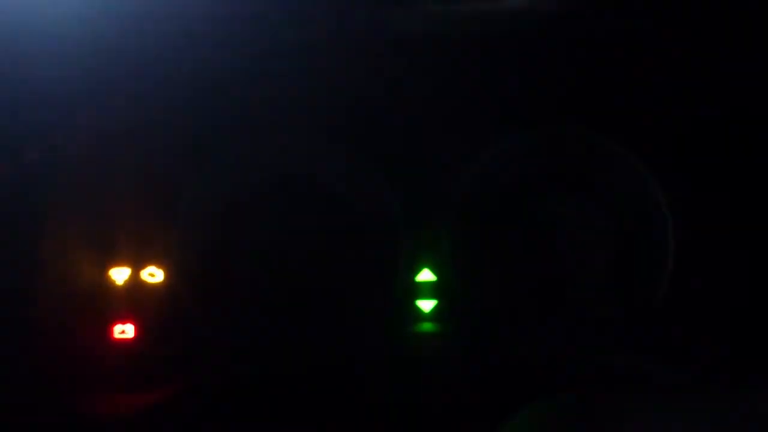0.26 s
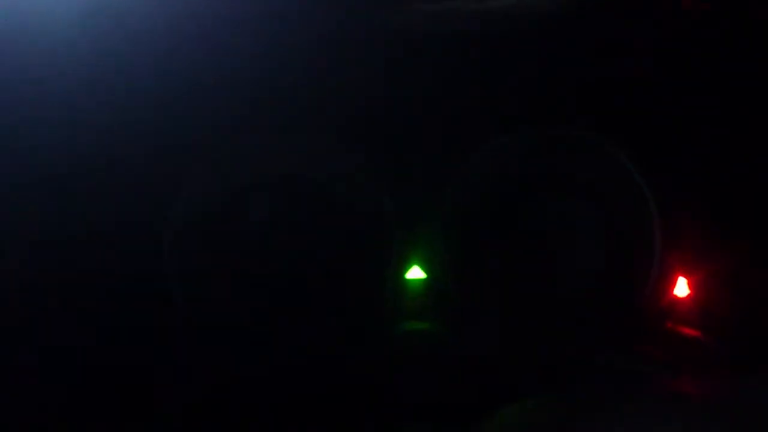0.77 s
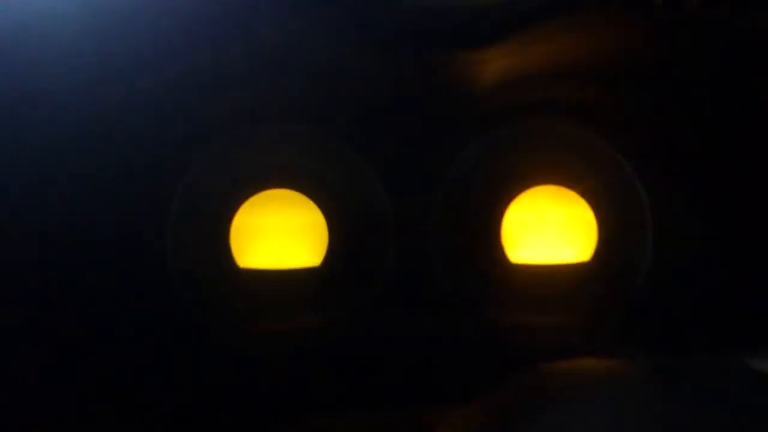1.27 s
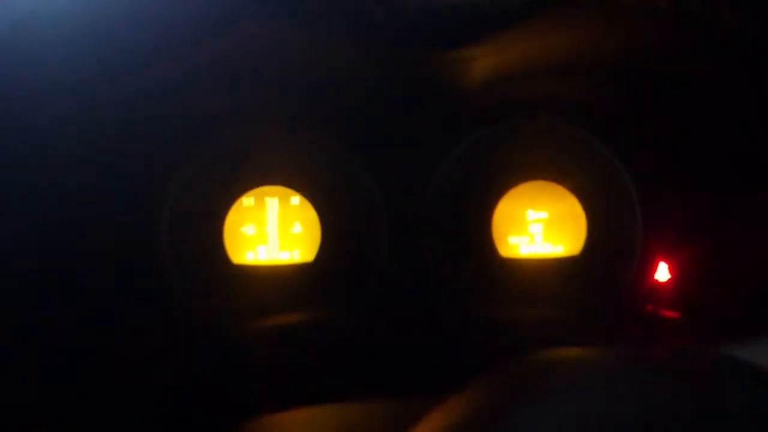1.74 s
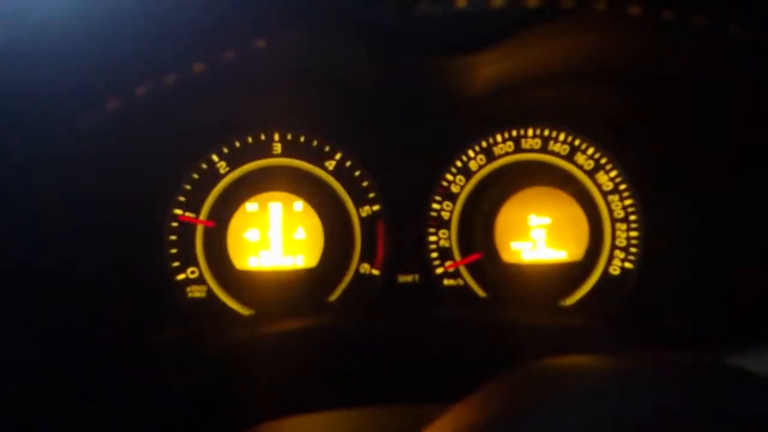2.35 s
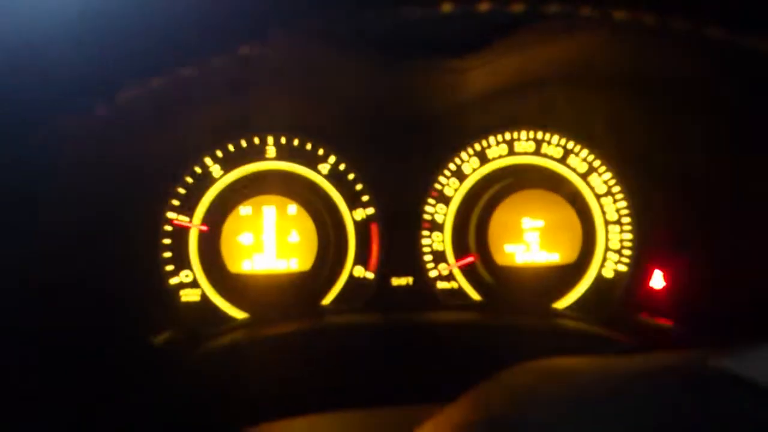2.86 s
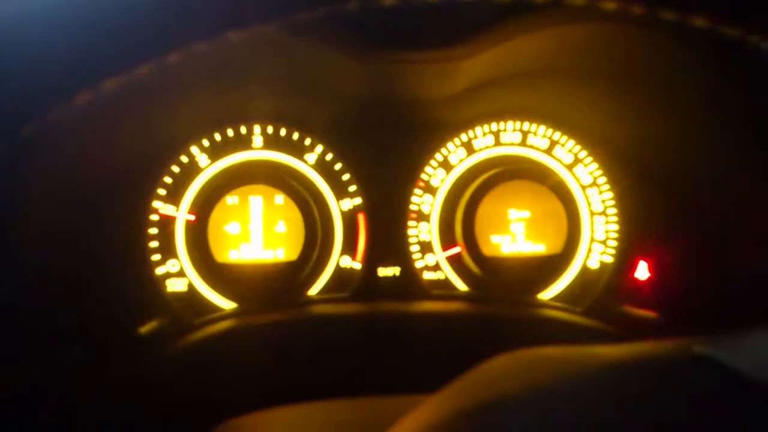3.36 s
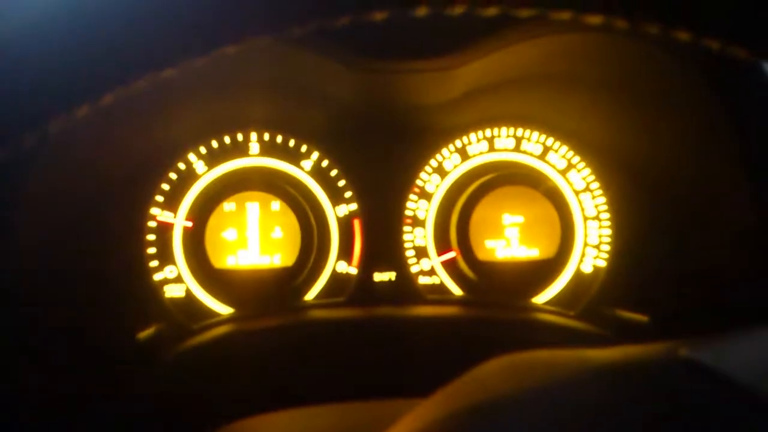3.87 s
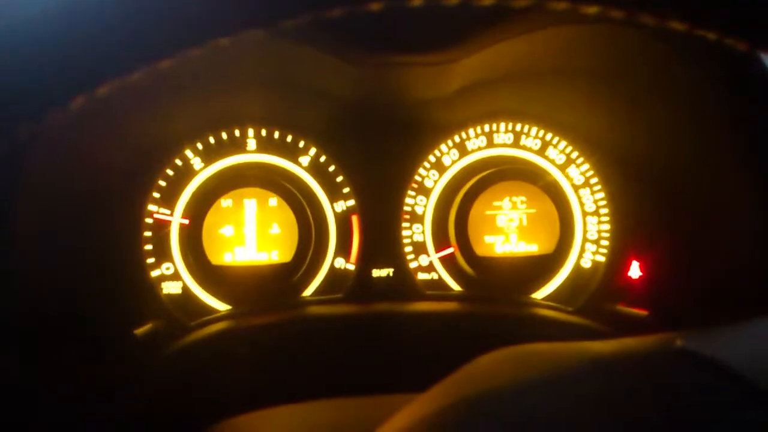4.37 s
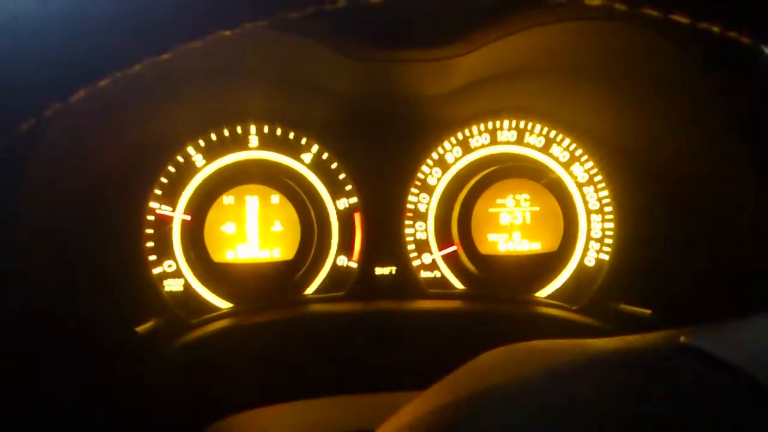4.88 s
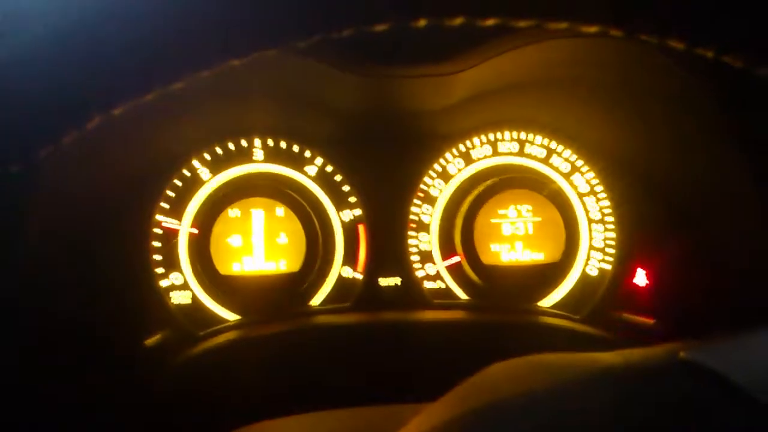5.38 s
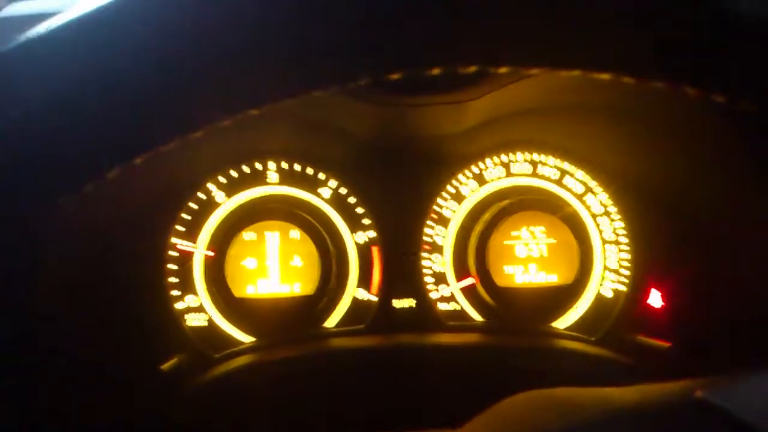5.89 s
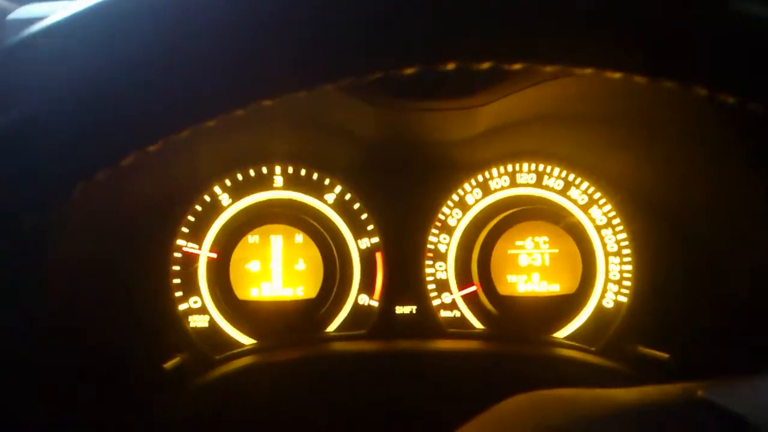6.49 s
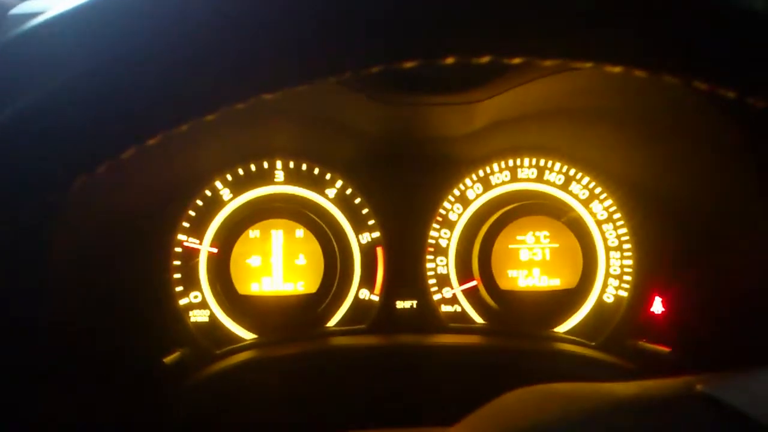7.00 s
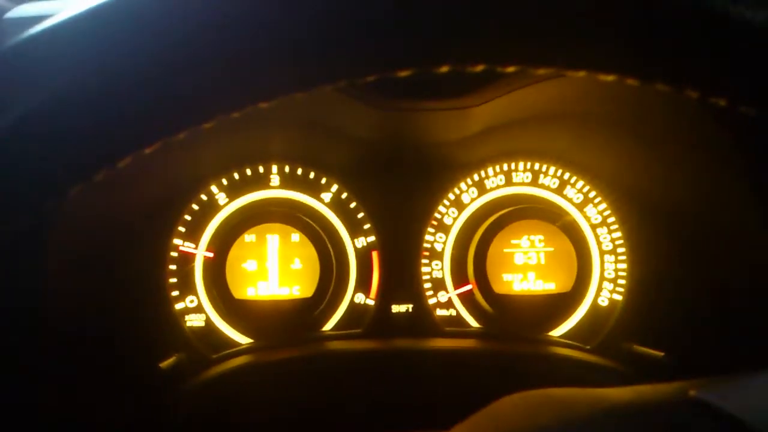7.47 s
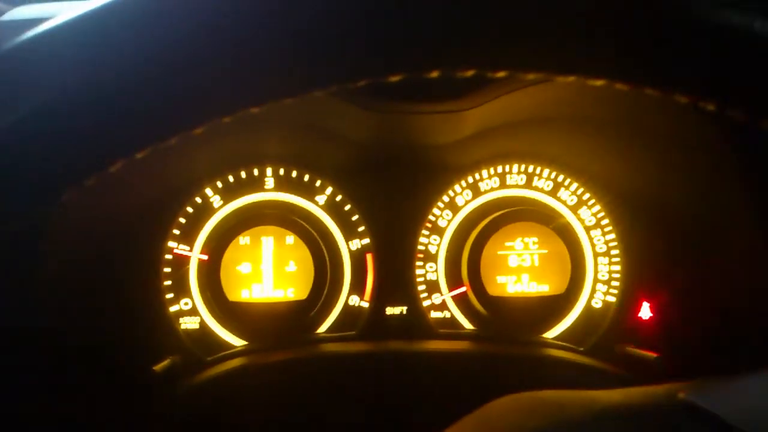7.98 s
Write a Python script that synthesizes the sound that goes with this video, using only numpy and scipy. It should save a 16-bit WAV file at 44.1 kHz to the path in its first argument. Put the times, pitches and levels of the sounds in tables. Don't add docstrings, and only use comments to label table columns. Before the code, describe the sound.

A labouring starter whirrs briefly, a four-cylinder diesel fires up and booms into clattery idle, with cloth rustles and small clicks near the microphone.

```python
import sys
import numpy as np
from scipy import signal
from scipy.fft import rfft, irfft, next_fast_len
from scipy.io import wavfile
from scipy.ndimage import uniform_filter1d

SR = 44100
rng = np.random.default_rng(int(sys.argv[2]) if len(sys.argv) > 2 else 0)


def materialize(psi):
    bounded = np.clip(np.atleast_2d(psi).T, -1, 1)
    quanta = np.round(bounded * 32767).astype(np.int16)
    wavfile.write(sys.argv[1], SR, quanta)


def voltage_ratio(decibels):
    exponent = np.asarray(decibels, float) / 20
    return 10 ** exponent


N = 363384
T = np.arange(N) / SR


def curve(table):
    s, *columns = np.transpose(table)
    return [np.interp(T, s, c) for c in columns]


def by_speed(table, hz):
    rate, *columns = np.transpose(table)
    return [np.interp(hz, rate, c) for c in columns]


def ramp(start, end):
    return np.clip((T - start) / (end - start), 0, 1)


def heard(table, fade=0.024):
    inside = np.clip(np.minimum(T - table[0][0], table[-1][0] - T) / fade + 1, 0, 1)
    return inside * voltage_ratio(curve(table)[0])


def unit(x):
    return x / np.sqrt(np.mean(x ** 2))


def colour(x, spectrum):
    hz, db = np.transpose(spectrum)
    size = next_fast_len(N)
    f = np.arange(1, size // 2 + 2) * SR / size
    gain = voltage_ratio(np.interp(np.log(f), np.log(hz), db, -120, -120))
    return unit(irfft(rfft(x, size) * gain, size)[:N])


def ring(x, modes):
    out = np.zeros(N)
    for k, (hz, width, db) in enumerate(modes):
        out += (-1) ** k * voltage_ratio(db) * signal.lfilter(*signal.iirpeak(hz, hz / width, SR), x)
    return unit(out)


def noise():
    return rng.standard_normal(N)


def walk(rate):
    k = int(SR / rate)
    return uniform_filter1d(np.repeat(rng.standard_normal(N // k + 1), k)[:N], k)


def cyclic(turn, share, renew):
    size = 5500
    place = (turn / 4 % 1 * size).astype(int)
    first, second = rng.standard_normal((2, size))[:, place]
    drift = renew * np.cumsum(walk(2.022) + 1) / SR
    share = np.clip(share, 0, 1)
    repeated = np.cos(drift) * first + np.sin(drift) * second
    return np.sqrt(share) * repeated + np.sqrt(1 - share) * noise()


def burst(turn, hz, t60, scatter_db, rise=0.00099):
    since = turn % 1 / hz
    strength = voltage_ratio(scatter_db * rng.standard_normal(600))[turn.astype(int)]
    return strength * (1 - np.exp(-since / rise)) * voltage_ratio(-60 * since / t60)


# hardest moment in seconds, free again in seconds, level in dB.
COMPRESSIONS = [
    (-.06, -0.047, -41),
    (0.073, 0.145, -35.5),
    (.23, 0.275, -37),
    (0.37, 0.427, -36.5),
    (0.458, 0.503, -39),
    (0.522, 0.577, -38),
    (0.596, .66, -44),
]
FREE_DB = -50


def labour():
    return heard([row for hard, free, db in COMPRESSIONS for row in ((hard, db), (free, FREE_DB))])


# frequency in Hz, density in dB per Hz.
GRIND = [(35, -42), (60, -16), (203, -39), (247, -18), (411, -4), (581, -19), (931, -15.5), (1470, -28),
         (1730, -38), (2030, -34), (4600, -31.5), (5980, -36), (10100, -120)]
# resonance in Hz, width in Hz, level in dB.
PINION = [(275, 75, 2), (323, 43, 1.5), (460, 73, -2.5), (729, 46, 3), (850, 210, -10), (1480, 280, -13),
          (2070, 540, -19.5), (3490, 380, -14), (4070, 220, -19.5)]


def starter():
    teeth = noise() * voltage_ratio(1.2 * rng.exponential(size=N)) * voltage_ratio(1.5 * walk(120))
    return labour() * (voltage_ratio(-5.5) * colour(teeth, GRIND) + voltage_ratio(0.5) * ring(teeth, PINION))


WHIRR_HZ, WHIRR_DB = (247.5, 374, 434.3), -46.5
HELPED_S, RELEASE_S = .42, .65
HOUSING_HZ, HOUSING_DB_PER_HZ = 880, .09
# multiple of the tooth rate, level in dB.
WHIRR_TONES = [(1, -1), (3, -5), (4, -9)]


def whirr():
    held, helped, free = WHIRR_HZ
    hard = [row[0] for row in COMPRESSIONS] + [RELEASE_S + 0.11]
    rows = []
    for a, b in zip(hard, hard[1:]):
        rows += [(a, held if a < HELPED_S else helped), ((a + b) / 2, free)]
    hz = uniform_filter1d(curve(rows)[0], size=SR // 25) * (1 + 0.0294 * walk(90.1))
    angle = 2 * np.pi * np.cumsum(hz) / SR
    tones = np.zeros(N)
    for k, db in WHIRR_TONES:
        muffled_db = HOUSING_DB_PER_HZ * np.maximum(k * hz - HOUSING_HZ, 0)
        tones += voltage_ratio(db + 4.2 * walk(60) - muffled_db) * np.sin(k * angle)
    return voltage_ratio(WHIRR_DB) * np.sqrt(2) * (1 - ramp(RELEASE_S, RELEASE_S + 0.0305)) * tones


LOAD_S = (3.98, 4.2, 4.42, 4.58)


def load():
    carried = ramp(*LOAD_S[2:])
    return ramp(*LOAD_S[:2]) - carried, carried


def flare():
    centre_s, width_s = 1.45, 0.14
    return np.exp(-((T - centre_s) / width_s) ** 2)


SETTLE_S = (1.2, 1.3)
LEAD_RAD = (6.4, 2.4, 4.7, 3.8)


def lead_rad():
    run, idle, dragged, loaded = LEAD_RAD
    drag, carried = load()
    return run + (idle - run) * ramp(*SETTLE_S) + (dragged - idle) * drag + (loaded - idle) * carried


# firing rate in Hz, boom in dB at 1, 2, 3 and 4 times that rate.
BOOM = [(5.6, -61, -40, -60, -54), (6.4, -41, -45, -62, -49), (12, -40, -35, -38, -47),
        (15.3, -26.5, -49, -52, -36), (22, -28, -33.5, -41, -50), (24.6, -26.5, -35, -37, -32),
        (27.3, -27, -54, -43, -40), (28.7, -25, -41, -42, -48), (30.3, -29, -30.5, -47, -41),
        (33.05, -29, -33, -48.5, -39), (34.7, -31, -21, -37, -42)]
LOAD_DB = (2.4, 0, 0, -22)
LOADED_DB = (-1, 0.7, 1.5, 1.5)
FLARE_DB, FLARE_RUMBLE_DB = 13, 3


def tones_db(hz):
    drag, carried = load()
    levels = []
    for db, dragged, loaded in zip(by_speed(BOOM, hz), LOAD_DB, LOADED_DB):
        levels.append(db + dragged * np.minimum(2 * drag, 1) + loaded * carried)
    levels[2] = levels[2] + FLARE_DB * flare()
    return levels


# multiple of the firing rate, level in dB relative to the first tone.
UPPER = [(.5, -32.5), (.75, -55), (1.5, -48.5), (2.5, -48), (3.5, -45), (5, -21), (6, -25.5), (7, -28.5),
         (8, -35.5), (10, -33.5), (11.75, -30.5), (22, -33), (29, -35.5), (38, -40.5)]


def boom(turn, levels_db):
    lead = lead_rad()
    angle = 2 * np.pi * turn
    out = voltage_ratio(levels_db[0]) * np.cos(angle)
    out += voltage_ratio(levels_db[1]) * np.cos(2 * angle + lead)
    out += voltage_ratio(levels_db[2]) * np.sin(3 * angle + lead)
    out -= voltage_ratio(levels_db[3]) * np.cos(4 * angle + 2 * lead)
    for k, db in UPPER:
        out += voltage_ratio(levels_db[0] + db + 2.4 * walk(6)) * np.cos(k * (angle + lead / 2) + walk(3))
    return np.sqrt(2) * out


# frequency in Hz, density in dB per Hz.
RUMBLE = [(24, -12), (40, 2), (62, -9.5), (103, -3), (136, -7), (233, -14.5), (366, -23.5), (592, -26),
          (685, -20.5), (1040, -25.5), (1300, -27), (1690, -107), (2860, -120)]
# resonance in Hz, width in Hz, level in dB.
PANELS = [(250, 20.2, -3.5), (362.6, 25.5, 0), (453, 36.3, -4.5), (535, 44, -8), (679, 54, -12),
          (914, 35, -16)]


def body(turn, hz, db):
    jolts = burst(2 * turn + .25, 2 * hz, .09, .6) * cyclic(turn, .6, renew=.7)
    swell = 1 + .2 * np.cos(4 * np.pi * turn + 1.5)
    shake = colour(cyclic(turn, .8, renew=.8) * swell, RUMBLE)
    lope = 1 + 0.097 * np.cos(np.pi * turn / 2 + 3.7)
    return voltage_ratio(db) * (shake + voltage_ratio(-4.0) * lope * ring(jolts, PANELS))


# frequency in Hz, density in dB per Hz.
GEAR = [(530, -7), (900, -6.5), (1180, -21), (1490, -8), (2200, -11.5), (2570, -12), (3340, -14.5),
        (4120, -16.5), (7140, -31), (9000, -51.5), (11700, -83), (19800, -120)]
# resonance in Hz, width in Hz, level in dB.
BLOCK = [(1383, 50, 2), (1560, 37, 7), (1740, 203, 2), (2030, 40, 7.5), (2200, 130, -4), (2760, 180, 5),
         (3093, 240, -10.5), (3403, 57, 2.5), (4270, 230, -19), (4840, 160, -4.5), (5570, 390, -14.5),
         (6540, 270, -11.5)]


def gear(turn, db):
    swell = 1 + .12 * np.cos(2 * np.pi * turn + .9)
    ticks = cyclic(turn, .3, renew=1.5) * voltage_ratio(1.5 * rng.exponential(size=N)) * swell
    return voltage_ratio(db + 0.64 * walk(17)) * (colour(ticks, GEAR) + voltage_ratio(-11.5) * ring(ticks, BLOCK))


LIGHT_TURN = (.44, .64, .575)


def light_off(turn):
    idle, dragged, loaded = LIGHT_TURN
    drag, carried = load()
    return turn + idle + (dragged - idle) * drag + (loaded - idle) * carried


# frequency in Hz, level in dB.
CRACK = [(900, -7.5), (1500, 1.5), (3000, -2.5), (4500, -9.5), (6500, -16), (9000, -28)]


def knock(turn, hz, db):
    light = light_off(turn)
    since = np.minimum(light % 1 / hz * SR, 3999).astype(int)
    habit = rng.standard_normal((5, 4000))
    gas = habit[4, since] + .2 * habit[light.astype(int) % 4, since] + .5 * noise()
    crack = colour(burst(light, hz, 0.026, 1.0, rise=0.0045) * gas, CRACK)
    rung = ring(burst(light, hz, 0.072, 0.48, rise=0.0021) * gas, BLOCK)
    return voltage_ratio(db) * (rung + voltage_ratio(-4.5) * crack)


INJECTOR_DB, PILOT_TURN = -15.5, .13
# frequency in Hz, level in dB.
NEEDLE = [(3800, -10.5), (4700, -3), (5500, -1), (6300, -4), (7200, -31)]


def injectors(turn, hz, db):
    light = light_off(turn)
    snaps = sum(burst(light - late, hz, 0.07, 1.3, rise=.0006) for late in (0, PILOT_TURN))
    return voltage_ratio(db + INJECTOR_DB) * colour(snaps * noise(), NEEDLE)


# resonance in Hz, width in Hz, level in dB.
DRY = [(226.6, 45, -3), (264, 22, 4.5), (472, 71, -5.5), (1600, 200, -13), (1940, 350, -14)]
RATTLE_S, RATTLE_DB, OIL_DB_PER_S = (0.5, .8), -43.5, -2.5


def rattle(turn):
    db = RATTLE_DB - 28 * (1 - ramp(*RATTLE_S)) + OIL_DB_PER_S * (T - RATTLE_S[1])
    return voltage_ratio(db) * ring(cyclic(turn, 0.66, renew=1.5), DRY)


KEY_BACK_S, METAL_T60_S, PLASTIC_T60_S = .715, 0.11, 0.045
# start in seconds, peak in dB, ring in Hz, snap in dB, bright edge in dB.
CLICKS = [(0.5347, -32.5, 1900, -18.5, -37), (0.5905, -25, 1970, -22.5, -31.5),
          (0.607, -30, 1660, -24, -47), (0.6929, -30.5, 1710, -7.5, -6), (0.7325, -24.5, 1910, -11, -14),
          (0.7643, -16, 2010, -16, -29), (0.79, -37, 1820, -5, -9), (0.863, -30.5, 1870, -28, -36),
          (1.0097, -31.5, 1920, -25, -20), (1.8749, -29, 3340, -12.5, -22), (2.846, -37.5, 1720, -8, -15.5),
          (3.47, -22.5, 1740, -12.5, -25.5), (3.4968, -26, 1560, -20, -34.5),
          (5.4377, -37.5, 1036, -10, -13)]
# start in seconds, peak in dB, pitch in Hz, 60 dB decay in seconds.
THUMPS = [
    (2.097, -23, 136, 0.07),
    (2.098, -38, 95, 0.068),
    (2.102, -31.5, 245, 0.043),
    (2.117, -27, 144, 0.068),
    (0.526, -23, 40, 0.16),
    (0.587, -35, 61.9, 0.11),
    (0.691, -38, 99, 0.11),
]


def clicks():
    out, rough, since = np.zeros(N), noise(), T[:SR // 4]
    wide = colour(rough, [(1200, 4.0), (1800, 4.5), (2700, 1.0), (3500, 2.0), (4400, -9)])
    snap = colour(rough, [(4200, 0.5), (5000, 6.0), (8500, -8.5)])
    bright = colour(rough, [(8000, -13), (9500, -11.5), (15000, -9), (16000, -20)])
    for s, db, hz, snap_db, bright_db in CLICKS:
        t60 = METAL_T60_S if s < KEY_BACK_S else PLASTIC_T60_S
        span = int(s * SR) + np.arange(len(since))
        fade = (1 - np.exp(-since / 0.001)) * voltage_ratio(db - 60 * since / t60)
        edge = voltage_ratio(snap_db + 1.5) * snap[span] + voltage_ratio(bright_db - 1.0) * bright[span]
        tone = 0.4 * np.sin(2 * np.pi * hz * since)
        out[span] += fade * (tone + 0.41 * wide[span] + voltage_ratio(-25 * since / t60) * edge)
    for s, db, hz, t60 in THUMPS:
        span = int(s * SR) + np.arange(len(since))
        fade = (1 - np.exp(-since / 0.0028)) * voltage_ratio(db - 60 * since / t60)
        out[span] += 2 * fade * np.sin(2 * np.pi * hz * since)
    return out


# peak in seconds, rise in seconds, fall in seconds, level in dB.
SLEEVE = [(.97, 0.2, 0.17, -52), (1.5, 0.56, 0.11, -48.5), (1.65, 0.088, 0.06, -53.5),
          (1.88, 0.033, 0.05, -49), (2.101, 0.13, 0.05, -50.5), (2.26, 0.064, 0.11, -57.5),
          (2.48, 0.1134, .12, -51), (2.85, 0.061, 0.054, -53.5), (3.22, 0.23, 0.57, -49.5)]
STROKE_DB = 17.5


def strokes():
    out = np.zeros(N)
    for s, rise, fall, db in SLEEVE:
        out += voltage_ratio(db - STROKE_DB * np.maximum((s - T) / rise, (T - s) / fall))
    return out


# frequency in Hz, density in dB per Hz.
CLOTH = [(1470, -28), (2500, -8.5), (2990, -9), (4910, -6.5), (10100, -22.5), (11500, -33.5),
         (15000, -20.5)]


def sleeve():
    grains = noise() * voltage_ratio(0.93 * rng.exponential(size=N))
    return strokes() * voltage_ratio(2.76 * walk(40) - 1.0) * colour(grains, CLOTH)


COLD_DB, COLD_DB_PER_S = -50.5, -1.1
FLOOR_DB, FLOOR_DB_PER_S = -60, 0.98
# resonance in Hz, width in Hz, level in dB.
COLD_RING = [(447, 70, -2.5), (536, 51, -5.5)]
FLOOR_RING = [(366, 45, -0.5), (324, 40, -7.5)]


def cold(turn, hz):
    shake = cyclic(turn, .92, renew=.3)
    first, second = (burst(turn / 4 + early, hz / 4, .11, .8, rise=.006) * shake for early in (.69, .54))
    bulkhead = voltage_ratio(COLD_DB + COLD_DB_PER_S * T) * ring(first, COLD_RING)
    floor = voltage_ratio(FLOOR_DB + FLOOR_DB_PER_S * T) * ring(second, FLOOR_RING)
    return ramp(*SETTLE_S) * (bulkhead + floor)


# multiple of the firing rate, level in dB.
DRONE = [(6, -50.5), (12, -49.5)]


def drone(turn):
    hum = np.zeros(N)
    for k, db in DRONE:
        hum += np.sqrt(2) * voltage_ratio(db + 1.5 * walk(8)) * np.cos(2 * np.pi * k * turn)
    return load()[0] * hum


FIRST_TURN = .472
WARM_S, WARM_DB = (1.8, 3.06), 3
ADVANCE_S, ADVANCE_DB = 3.52, -49
LOAD_KNOCK_DB, LOAD_GEAR_DB = -3, -2.5
# time in seconds, firing rate in Hz.
SPEED = [(0.0, 5.51), (0.32, 6.69), (0.5, 13.81), (0.6, 15.55), (0.68, 20.65), (0.8, 23.97), (1.16, 30.75),
         (1.21, 34.13), (1.37, 32.17), (2.37, 31.8), (3.17, 32.07), (3.94, 31.67), (4.02, 30.59),
         (4.24, 30.38), (4.67, 32.87), (4.91, 30.93), (4.97, 32.01), (8.24, 31.68)]
# firing rate in Hz, body rumble in dB, valve gear in dB, cold knock in dB.
CLATTER = [(5.6, -51, -58, -77), (10, -45, -53, -68), (14.75, -38.5, -49, -60), (23.8, -38, -47, -53.5),
           (28.2, -38, -52, -51.5), (29.6, -42.5, -52, -60.5)]


def scene():
    hz, = curve(SPEED)
    turn = FIRST_TURN + np.cumsum(hz) / SR
    rumble_db, gear_db, knock_db = by_speed(CLATTER, hz)
    drag, warm_db = load()[0], WARM_DB * ramp(*WARM_S)
    knock_db = np.where(T < ADVANCE_S, knock_db + warm_db, ADVANCE_DB + LOAD_KNOCK_DB * drag)
    out = starter() + whirr()
    out += boom(turn, tones_db(hz)) + body(turn, hz, rumble_db + FLARE_RUMBLE_DB * flare())
    out += gear(turn, gear_db + warm_db + LOAD_GEAR_DB * drag)
    out += knock(turn, hz, knock_db) + injectors(turn, hz, knock_db) + rattle(turn)
    out += clicks() + sleeve() + cold(turn, hz) + drone(turn)
    return out[None]


def squelch(x, floor_db, mask_db, spread_db):
    frame = dict(window="cosine", nperseg=2048, noverlap=1024)
    z = signal.stft(np.pad(x, (15, 0)), **frame)[2]
    bands = z[256:1024].reshape(24, 32, -1)
    level_db = 10 * np.log10(np.mean(abs(bands) ** 2, axis=1) + 1e-30)
    bass = np.sum(abs(z[:10]) ** 2, axis=0)
    booming = np.clip(2 * np.log10(bass + 1e-30) + 7.4, 0, 1)
    reach = np.exp(-((np.arange(24) - 2.3) / 2.2) ** 2)[:, None]
    bar_db = floor_db + mask_db * booming * reach
    keep = level_db > bar_db + spread_db * rng.standard_normal(level_db.shape)
    z[256:1024] = (bands * keep[:, None]).reshape(768, -1)
    return signal.istft(z, **frame)[1][15:15 + N]


def band_limit(x):
    return signal.sosfilt(signal.butter(12, 16100, fs=SR, output="sos"), x)


HISS_DB, DUCK_S, DUCK_DB, CREEP_DB, CREEP_S = -60.5, 0.494, -6, -4, 0.5
OFFSET = .002


def record(dry):
    hiss = colour(noise(), [(2000, -10), (5000, 0), (15800, 0), (16000, -20)])
    ducked_db = DUCK_DB + CREEP_DB * (1 - np.exp(-(T - DUCK_S) / CREEP_S))
    hiss_db = HISS_DB + (T > DUCK_S) * ducked_db
    rounded = np.tanh(dry[0] * 5) / 4.8
    sound = squelch(rounded + voltage_ratio(hiss_db) * hiss, floor_db=-94.5, mask_db=4.0, spread_db=2.0)
    return band_limit(sound[None] + OFFSET)


dry = scene()
out = record(dry)
materialize(out)
```